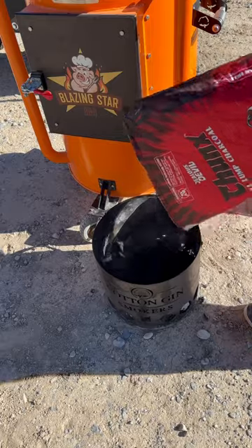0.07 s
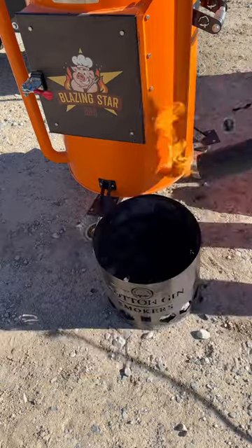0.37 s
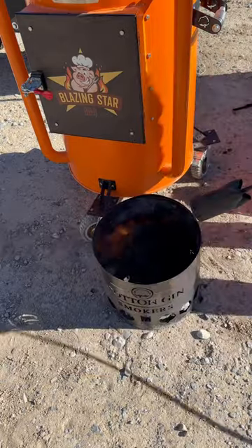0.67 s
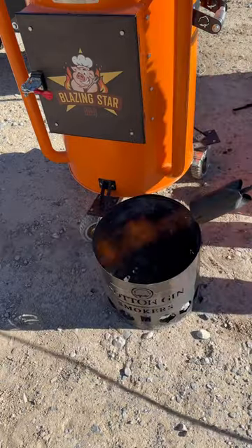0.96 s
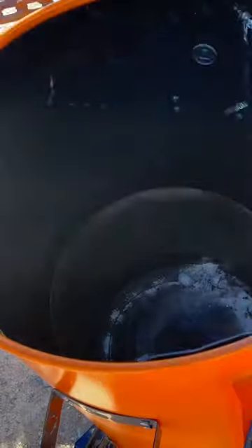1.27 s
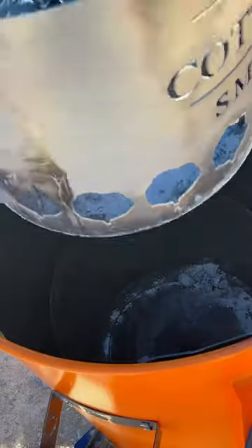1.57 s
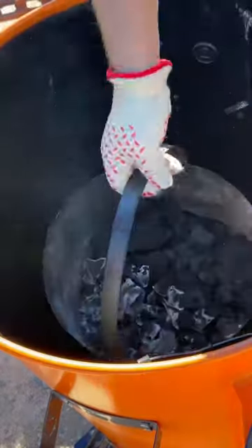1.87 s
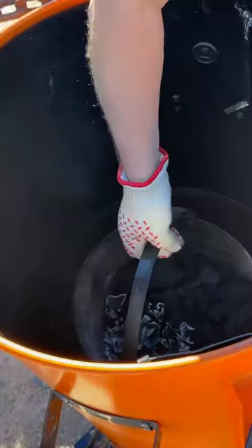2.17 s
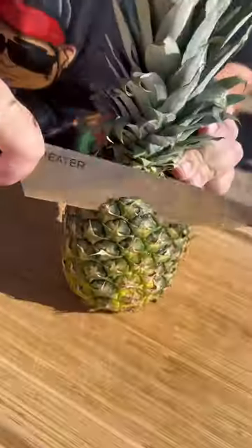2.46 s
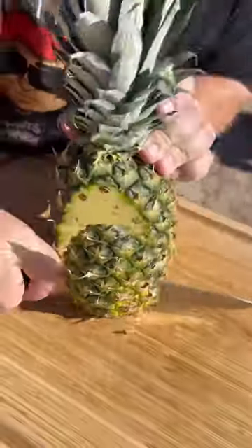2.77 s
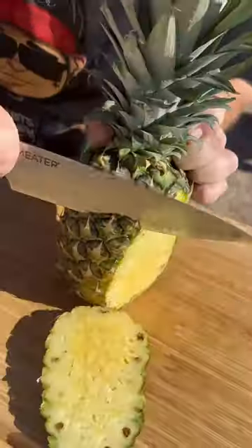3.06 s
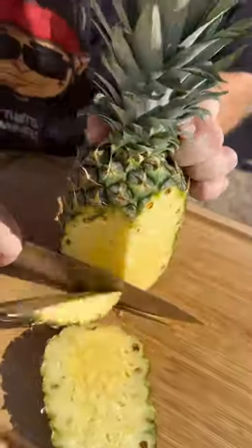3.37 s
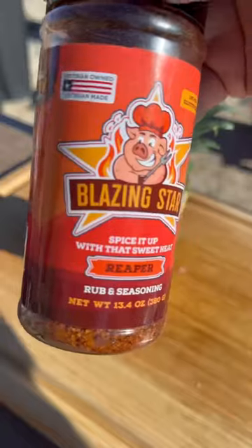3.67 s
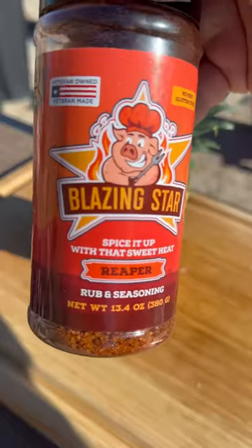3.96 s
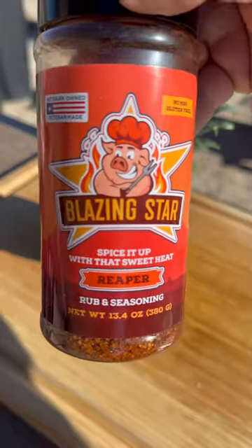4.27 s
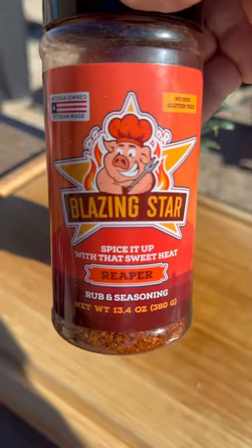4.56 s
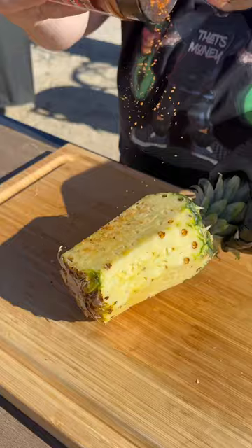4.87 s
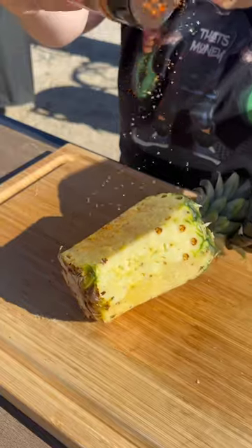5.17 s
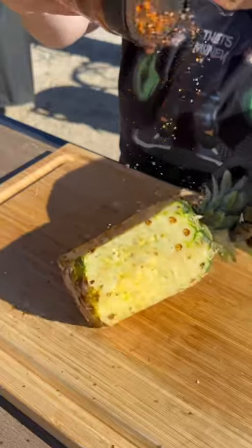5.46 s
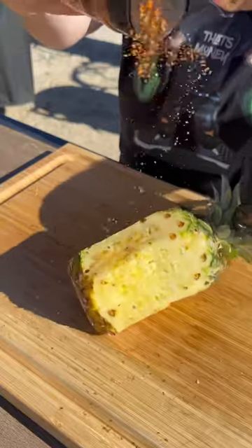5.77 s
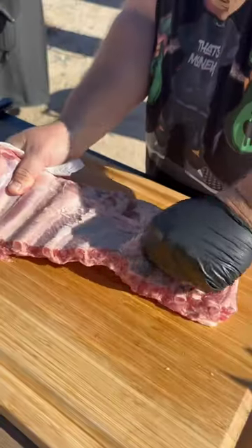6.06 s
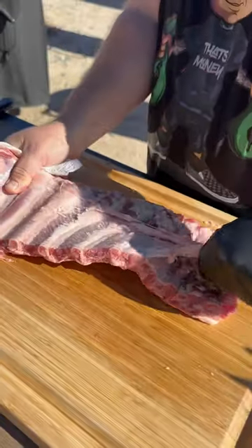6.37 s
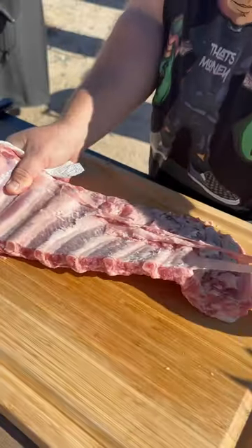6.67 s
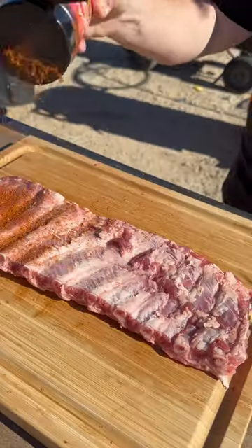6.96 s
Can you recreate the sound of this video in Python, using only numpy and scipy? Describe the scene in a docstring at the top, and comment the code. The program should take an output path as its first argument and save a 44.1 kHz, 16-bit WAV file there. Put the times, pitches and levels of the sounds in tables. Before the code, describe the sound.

Charcoal clatters briefly into a steel basket. A gas torch clicks, howls softly and roars, then the basket brushes quietly down into a drum. A knife crunches through pineapple, knocking on a wooden board. After a pause, a seasoning shaker hisses rhythmically, ribs are trimmed with wet scrapes, and fine grains pour faintly. Everything is close to a stereo microphone outdoors, over a low distant rumble.

```python
"""An outdoor barbecue, close to a stereo microphone pair, with a low rumble in the distance.
Lump charcoal clatters into a steel basket. A gas torch clicks, idles with a howl and roars into it,
then the basket brushes its way down into a drum. A knife crunches through a pineapple onto a wooden
board. After a pause a shaker hisses over a soft rustle; ribs are trimmed wetly while something hums
far off, and last a fine rub pours over them."""
import sys
import numpy as np
from scipy import signal
from scipy.fft import rfft, irfft
from scipy.io import wavfile
from scipy.ndimage import map_coordinates

SR = 44100
rng = np.random.default_rng(int(sys.argv[2]) if len(sys.argv) > 2 else 0)


def waveform_to_disk(signal):
    """Save audio, clipped to [-1, 1], as 16-bit WAV at the path in sys.argv[1]."""
    frames = np.transpose(np.atleast_2d(signal))
    scaled = np.clip(frames, -1, 1) * 32767
    samples = np.round(scaled).astype(np.int16)
    wavfile.write(sys.argv[1], SR, samples)


N = 318402
TIME = np.arange(N) / SR
SIDES = np.array([[1], [-1]])   # opposite polarity left and right


def from_db(db):
    """Decibels to gain."""
    return 10 ** (np.asarray(db) / 20)


def rms_one(x):
    """Scale to unit power."""
    return x / np.sqrt(np.mean(x ** 2) + 1e-20)


def drift(per_s):
    """A smooth random wander; rms 1."""
    knots = rng.standard_normal(8000)
    return rms_one(map_coordinates(knots, [TIME * per_s], order=3, mode="wrap"))


def gate(start_s, end_s, attack_s=.005, release_s=.005):
    """Attack, hold, release."""
    return np.clip((TIME - start_s) / attack_s, 0, 1) * np.clip((end_s - TIME) / release_s, 0, 1)


def swells(rows, lag_s=0):
    """A gain curve for each level column: every stroke climbs 20 dB in rise_s and sinks 20 dB in fall_s."""
    power = 0
    for peak_s, rise_s, fall_s, *levels_db in rows:
        age = TIME - peak_s - lag_s
        shape = from_db(-20 * np.minimum(np.maximum(-age / rise_s, age / fall_s), 10))
        power = power + np.outer(from_db(levels_db), shape) ** 2
    return np.sqrt(power)


def colour(x, spectrum, size=4096):
    """Causal (minimum-phase) filter with the given spectrum; white noise keeps its power."""
    hz, db = np.transpose(spectrum)
    grid = np.maximum(np.arange(size // 2 + 1) * SR / size, 1)
    cepstrum = irfft(np.log(from_db(np.interp(np.log(grid), np.log(hz), db))))
    cepstrum[1:size // 2] *= 2
    cepstrum[size // 2 + 1:] = 0
    response = irfft(np.exp(rfft(cepstrum)))
    return signal.oaconvolve(x, response / np.linalg.norm(response))[:N]


def noise(spectrum):
    """Steady noise with the given spectrum; rms about 1."""
    return colour(rng.standard_normal(N), spectrum)


def grains(per_s, spread_db, hiss_db):
    """Random tiny snaps of uneven size on a bed of hiss; rms 1."""
    sizes = from_db(spread_db * np.minimum(rng.exponential(1, N), 4)) * rng.choice([-1, 1], N)
    snaps = rms_one(sizes * (rng.random(N) < per_s / SR))
    return rms_one(snaps + from_db(hiss_db) * rng.standard_normal(N))


def burst(start_s, db, t60_s, size=6000):
    """A brittle contact: noise that starts at once and dies away."""
    out, start = np.zeros(N + size), round(start_s * SR)
    out[start:start + size] = from_db(db - 60 * np.arange(size) / SR / t60_s) * rng.standard_normal(size)
    return out[:N]


def strikes(rows):
    """One click for each row of start_s, level_db."""
    out = np.zeros(N)
    for start_s, db in rows:
        out[round(start_s * SR)] += from_db(db)
    return out


def ring(force, modes):
    """A unit click sets each mode ringing at its level."""
    out = np.zeros(N)
    for hz, db, t60_s in modes:
        decay, angle = from_db(-60 / (t60_s * SR)), 2 * np.pi * hz / SR
        feedback = [1, -2 * decay * np.cos(angle), decay * decay]
        out += from_db(db) * signal.lfilter([0, np.sin(angle)], feedback, force + 1e-18)
    return out


def air_resonance(hz, width_hz):
    """Turbulence ringing in a cavity whose pitch may move; rms 1."""
    low = signal.butter(2, width_hz / 2, fs=SR, output="sos")
    real, imaginary = signal.sosfilt(low, rng.standard_normal((2, N)))
    return rms_one(np.real((real + 1j * imaginary) * np.exp(2j * np.pi * np.cumsum(hz) / SR)))


# the far-off rumble: frequency_hz, level_db
RUMBLE_SPECTRUM = [(20, -32.5), (35, -14.5), (57, 0.5), (85, -0.5), (123, -7), (180, -15.5), (230, -16.5),
                   (320, -28.5), (500, -38.5), (900, -42.5), (1500, -55), (5000, -64.5), (15000, -76)]

def rumble():
    """A low distant rumble, alike on both sides of the microphone except for its thin top."""
    mid, side = noise(RUMBLE_SPECTRUM), noise(RUMBLE_SPECTRUM)
    side = signal.sosfilt(signal.butter(1, 600, "high", fs=SR, output="sos"), side)
    return from_db(-47.5) * (mid + from_db(-3) * side * SIDES)


# surges of charcoal out of the bag: peak_s, rise_s, fall_s, level_db
POUR_SURGES = [(.004, .02, 0.032, -22.5), (.026, .01, .1, -22), (.084, .012, 0.042, -19),
               (.119, .022, 0.083, -15.5)]
# big lumps landing: start_s, level_db, pitch_hz
LUMP_LANDINGS = [(.001, -22.5, 2860), (0.021, -9.5, 2150), (.029, -14.5, 2260), (.037, -19, 1960),
                 (.049, -20, 3570), (0.063, -14.5, 3190), (0.083, -12, 3740), (0.112, -13, 2430),
                 (.121, -14, 2400), (0.133, -23, 3370)]
# the steel basket: pitch_hz, level_db, t60_s
BASKET_MODES = [(640, -14, 0.041), (760, -2, 0.023), (1505, 2.5, 0.023), (2250, -4, .12), (2510, -3, 0.12),
                (2700, -3, .12), (3236, 3, 0.2), (3640, -1, 0.055), (4466, -6, 0.29), (6100, 0.5, .25),
                (5998, -22, .25), (7230, 2.5, 0.051)]
# the clatter, close up: frequency_hz, level_db
CHARCOAL_SPECTRUM = [(100, -15), (300, -9.5), (700, -2.5), (1300, -5), (1800, -4), (2600, 1), (4200, -3),
                     (6500, -9.5), (10000, -6.5), (15000, -18.5)]

def charcoal(end_s=.189):
    """Lumps and crumbs strike each other, clink briefly and set the steel basket ringing."""
    crumbs = swells(POUR_SURGES)[0] * grains(per_s=2400, spread_db=3, hiss_db=-4.5)
    lumps = sum(burst(start_s, db, t60_s=.017) for start_s, db, _ in LUMP_LANDINGS)
    force = crumbs + from_db(-10) * lumps
    clinks = sum(ring(strikes([(start_s, db)]), [(hz, -2, .04), (hz * 1.62, -7, .025)])
                 for start_s, db, hz in LUMP_LANDINGS)
    steel = from_db(-38) * ring(force, BASKET_MODES)
    pouring = np.clip((end_s - TIME) / .0034, 0, 1)
    return (from_db(3) * colour(force, CHARCOAL_SPECTRUM) + clinks + steel) * pouring


# the torch's trigger: start_s, level_db
TRIGGER_CLICKS = [(0.189, -32), (0.2, -26)]
# its brass valve: pitch_hz, level_db, t60_s
BRASS_MODES = [(6260, -21.5, 0.49), (6610, -2, 0.087), (6524, -1, 0.11), (7311, -34, .5)]

def valve():
    """The trigger scrapes and snaps over, and the small valve rings."""
    force = from_db(-15.5) * sum(burst(start_s, db, t60_s=.013) for start_s, db in TRIGGER_CLICKS)
    snaps = sum(burst(start_s, db + 2, t60_s=.017) for start_s, db in TRIGGER_CLICKS)
    return ring(force, BRASS_MODES) + snaps


ROAR_START_S, ROAR_ATTACK_S = .556, .018
# the idling flame: frequency_hz, level_db
PILOT_SPECTRUM = [(100, -3.5), (300, -7.5), (400, -13.5), (620, -6.5), (800, -14), (1100, -20), (1700, -22),
                  (2500, -35), (4000, -35), (5600, -40), (7300, -32.5), (9000, -39.5), (15000, -37)]

def pilot(start_s=.19, settle_s=.14, start_hz=1297, settled_hz=1005):
    """The idling flame howls in its nozzle, sinking in pitch, until the torch opens."""
    unsettled = np.exp(-np.maximum(TIME - start_s, 0) / settle_s)
    howl_hz = settled_hz + (start_hz - settled_hz) * unsettled
    howl = from_db(-2.5) * air_resonance(howl_hz, width_hz=240)
    overtone = from_db(-20.5) * air_resonance(howl_hz * 2.25, width_hz=280)
    idling = gate(start_s, ROAR_START_S + ROAR_ATTACK_S, attack_s=.054)
    return idling * from_db(-39.5) * (from_db(-1.5) * noise(PILOT_SPECTRUM) + howl + overtone)


# the open flame, close up: frequency_hz, level_db
ROAR_SPECTRUM = [(25, -17.5), (65, -7), (120, 1), (190, -4.5), (290, -14), (450, -6.5), (590, -6),
                 (740, -19.5), (900, -4.5), (1200, -19), (1500, -21.5), (2000, -38), (4000, -39.5)]
# the gas jet: frequency_hz, level_db
JET_SPECTRUM = [(900, -18.5), (1700, -13.5), (1900, -3), (2100, -6), (2400, -0.5), (2900, -10.5),
                (3300, -9.5), (4000, -16.5), (5000, -16.5), (6500, -14), (10000, -23), (15000, -15.5)]

def torch(end_s=1.2, swell_s=.91, swell_width_s=.16):
    """The flame roars into the hollow basket under its hissing jet; both swell once with the gas flow."""
    flow = np.exp(-((TIME - swell_s) / swell_width_s) ** 2)
    air_hz = 1049.5 - 49.46 * flow   # the basket's air rings lower at the top of the swell
    flame = from_db(.07) * noise(ROAR_SPECTRUM) + from_db(-5) * air_resonance(air_hz, width_hz=210)
    jet = from_db(-3) * noise(JET_SPECTRUM) + from_db(-5.5) * air_resonance(air_hz * 2.36, width_hz=140)
    gulps = from_db(1.26 * drift(per_s=140))   # the flame burns unevenly
    burning = gate(ROAR_START_S, end_s, attack_s=ROAR_ATTACK_S, release_s=.0026)
    jet_rasp = flow * from_db(-26.5) * air_resonance(hz=np.full(N, 2050), width_hz=650)
    return burning * gulps * (from_db(-15 + 2 * flow) * flame + from_db(-25.5 + 3 * flow) * jet + jet_rasp)


# brushes against the inside of the drum: peak_s, rise_s, fall_s, level_db
DRUM_BRUSHES = [(1.21, .01, .5, -58), (1.402, 0.078, 0.12, -54.5), (1.48, .1, .25, -62),
                (1.635, .02, 0.042, -59), (1.82, .06, .3, -58), (2.02, .3, .3, -56), (2.19, .2, .3, -58)]
# their shuffle: frequency_hz, level_db
BRUSH_SPECTRUM = [(400, 2.5), (800, -12.5), (1400, -6.5), (1900, -9.5), (2600, -9.5), (4000, -7.5),
                  (7000, -9.5), (10000, -13.5), (15000, -17.5)]

def lowering():
    """Glove and basket brush their way down the drum."""
    return swells(DRUM_BRUSHES)[0] * colour(grains(per_s=1500, spread_db=3.5, hiss_db=-2), BRUSH_SPECTRUM)


# short contacts of basket, blade, rind and bone: start_s, level_db, pitch_hz
CONTACTS = [(1.382, -44, 885), (1.424, -39, 1310), (1.586, -47, 1320), (2.349, -3.5, 2280),
            (2.353, 1.5, 865), (2.471, -24, 2700), (2.637, -19, 7250), (2.684, -7.5, 2700),
            (2.692, 0.5, 1540), (2.739, -15.5, 2700), (2.754, -26, 3500), (2.764, -24.5, 3000),
            (2.834, -19.5, 5080), (2.889, -40, 1800), (2.955, -20, 3930), (3.13, -4, 1800),
            (3.139, -2, 1630), (3.233, -19, 3220), (3.288, -21, 4640), (3.362, -23.5, 6000),
            (5.557, -27, 8000), (5.957, -30, 4440), (6.121, -18, 7000), (6.62, -37, 3000),
            (6.766, -23, 5130), (6.768, -22.5, 1100), (6.843, -24.5, 2250), (6.849, -17, 720)]

def ticks(t60_s=.013, band_ratio=2.1, size=6000):
    """Each contact is a short crack, broadly peaked at its own pitch, with a thin bright edge."""
    out, age = np.zeros(N + size), np.arange(size) / SR
    fade = from_db(-60 * age / t60_s) * (1 - np.exp(-age / .001))
    for start_s, db, hz in CONTACTS:
        band = signal.butter(2, [hz / band_ratio, hz * band_ratio], "band", fs=SR, output="sos")
        snap = fade * rng.standard_normal(size)
        crack = signal.sosfilt(band, snap) + from_db(-15.5) * snap
        start = round(start_s * SR)
        out[start:start + size] += from_db(db) * crack * np.linalg.norm(fade) / np.linalg.norm(crack)
    return out[:N]


# knife strokes through the pineapple: peak_s, rise_s, fall_s, flesh_db, fibre_db
KNIFE_STROKES = [(2.351, 0.026, .03, -12, -17), (2.376, 0.024, 0.063, -10, -21.5),
                 (2.462, 0.024, 0.077, -41.5, -31.5), (2.548, 0.079, .09, -32.5, -27.5),
                 (2.645, 0.023, 0.055, -26.5, -22), (2.68, 0.066, 0.069, -22.5, -25),
                 (2.936, 0.0047, 0.04, -46, -40.5), (3.084, 0.012, 0.16, -32, -27.5),
                 (3.126, 0.033, 0.049, -20.5, -21), (3.24, 0.054, 0.031, -41.5, -32),
                 (3.43, 0.44, 0.23, -75, -54), (3.505, 0.028, .06, -51.5, -48)]
# crushed flesh: frequency_hz, level_db
FLESH_SPECTRUM = [(40, -12), (90, 2.5), (250, -1), (450, -1.5), (800, 2.5), (1500, -4.5), (2800, -9),
                  (4200, -22.5), (10000, -37.5)]
# tearing fibres: frequency_hz, level_db
FIBRE_SPECTRUM = [(100, -10.5), (400, -4.5), (900, -4.5), (2400, 2.5), (3600, 0.5), (5000, -1.5),
                  (8000, 1.5), (11000, -5), (15000, 2)]

def pineapple(flesh_drag_db=-72, fibre_drag_db=-62):
    """The rind's fibres snap brightly in uneven bunches; just after, juicy cells burst dully."""
    # between strokes the blade drags lightly in the fruit
    crushing = swells(KNIFE_STROKES, lag_s=.011)[0] + from_db(flesh_drag_db)
    tearing = swells(KNIFE_STROKES)[1] + from_db(fibre_drag_db)
    flesh = crushing * colour(grains(per_s=1800, spread_db=4.5, hiss_db=.5), FLESH_SPECTRUM)
    fibres = tearing * colour(grains(per_s=3500, spread_db=7, hiss_db=1), FIBRE_SPECTRUM)
    bunches = from_db(2.2 * drift(per_s=180))
    return (flesh + fibres * bunches) * gate(start_s=2.317, end_s=3.532)


# the blade pressed down onto the board: start_s, thud_db, knock_db
BLADE_LANDINGS = [(2.355, -14, -9), (2.367, -9.5, -20), (2.38, -22, -3), (2.476, -27.5, -39),
                  (2.574, -27, -42.5), (2.644, -28, -28), (2.693, -52, -17.5), (3.097, -23.5, -25),
                  (3.144, -30.5, -17.5), (3.382, -37.5, -63), (6.768, -57, -40.5), (6.853, -39, -43.5)]
# the table underneath: pitch_hz, level_db, t60_s
TABLE_MODES = [(80.6, 3, 0.15), (108, -14.5, 0.04)]
# the wooden board: pitch_hz, level_db, t60_s
BOARD_MODES = [(235, -21.5, 0.26), (324.6, -19, 0.28), (427, -9, 0.16), (647, -16, 0.1), (693, -16.5, 0.13),
               (863, -11.5, 0.053), (980, -21.5, 0.053), (1140, -27.5, 0.18), (1470, -15.5, 0.27)]

def board():
    """The blade lands through soft food: the table thuds and the board knocks."""
    thuds = strikes([(start_s, db) for start_s, db, _ in BLADE_LANDINGS])
    knocks = strikes([(start_s, db) for start_s, _, db in BLADE_LANDINGS])
    soft = signal.butter(1, 1500, fs=SR, output="sos")
    return signal.sosfilt(soft, ring(thuds, TABLE_MODES) + ring(knocks, BOARD_MODES))


SHAKE_START_S = 4.646
# dry flakes in the shaker: frequency_hz, level_db
FLAKE_SPECTRUM = [(400, -12), (600, -25), (850, -14), (1100, -14), (1900, -7), (2500, -2.5), (3600, -2),
                  (4900, -6), (6300, 2.5), (7300, -0.5), (9000, -1.5), (11000, -2.5), (15000, -7)]

def shaker(first_turn_s=4.692, shakes_per_s=7.34, growth_db_per_s=2.8):
    """Dry flakes slide and hiss at each even swing over the pineapple, a little harder as it goes."""
    age = TIME - first_turn_s
    swing_db = -7 * np.abs(np.sin(np.pi * shakes_per_s * age))   # loudest as the shaker turns
    level = from_db(-46 + swing_db + growth_db_per_s * age)
    clumps = from_db(.9 * drift(per_s=60))
    flakes = colour(grains(per_s=3500, spread_db=4.5, hiss_db=1), FLAKE_SPECTRUM)
    return gate(SHAKE_START_S, end_s=5.89, release_s=.039) * level * clumps * flakes


# the rustle around the microphone: frequency_hz, level_db
RUSTLE_SPECTRUM = [(250, -11.5), (420, 1.5), (620, -9), (880, -3.5), (1150, -12), (1400, -8.5), (2000, -14),
                   (6000, -19)]

def rustle(fade_db_per_s=4):
    """A soft low rustle from all around comes with the first shakes and slowly fades."""
    mid, side = noise(RUSTLE_SPECTRUM), noise(RUSTLE_SPECTRUM)
    fading = from_db(-60.5 - fade_db_per_s * np.maximum(TIME - SHAKE_START_S, 0))
    return gate(SHAKE_START_S, np.inf) * fading * (mid + from_db(.5) * side * SIDES)


def hum(pitch_hz=234):
    """A faint tone, far off and dead centre, while the ribs are trimmed."""
    humming = gate(start_s=5.88, end_s=6.8, attack_s=.038, release_s=.033)
    return humming * from_db(-59) * np.sin(2 * np.pi * pitch_hz * TIME)


# knife strokes along the ribs: peak_s, rise_s, fall_s, parting_db, scrape_db
RIB_STROKES = [(5.89, 0.016, 0.071, -58.5, -57.5), (6.085, .11, .12, -43.5, -62),
               (6.228, .1, .17, -41, -54), (6.42, 0.26, .2, -62, -51.5), (6.505, 0.061, 0.1, -38.5, -39),
               (6.7, 0.054, 0.1, -49.5, -70), (6.79, 0.065, 0.13, -40.5, -56)]
# wet meat parting: frequency_hz, level_db
MEAT_SPECTRUM = [(400, -6.5), (1000, -11), (2200, -3.5), (3700, -4), (5700, 0), (9000, 1), (11000, 0.5),
                 (15000, -1.5)]
# blade on bone: frequency_hz, level_db
BONE_SPECTRUM = [(250, -9), (500, -3.5), (1050, -8), (1600, -4), (2600, -3.5), (3600, 1), (4600, -8),
                 (10000, -21)]

def ribs():
    """Wet meat parts in tiny smacks while the blade scrapes along the bone."""
    parting, scraping = swells(RIB_STROKES)
    bunches = from_db(2 * drift(per_s=220))
    smacks = colour(grains(per_s=1500, spread_db=5, hiss_db=3.5), MEAT_SPECTRUM)
    bone = colour(grains(per_s=450, spread_db=6, hiss_db=2), BONE_SPECTRUM)
    return parting * bunches * smacks + scraping * bone


# fine seasoning falling: frequency_hz, level_db
RUB_SPECTRUM = [(400, -1), (900, -5), (1500, -9), (2200, 2.5), (3800, 3), (4900, -3), (6500, 5.5),
                (9000, -5), (15000, -18)]

def rub():
    """Fine grains pour steadily over the ribs."""
    patter = colour(grains(per_s=5000, spread_db=9.5, hiss_db=-.5), RUB_SPECTRUM)
    return gate(start_s=6.865, end_s=np.inf) * from_db(-58) * patter


def place(x, left_over_right_db, left_lag_ms, shadow_hz=400):
    """Above the bass one microphone port hears a source louder; the left port hears it a moment late."""
    top = signal.sosfilt(signal.butter(1, shadow_hz, "high", fs=SR, output="sos"), x)
    left = x + (from_db(left_over_right_db / 2) - 1) * top
    right = x + (from_db(-left_over_right_db / 2) - 1) * top
    late_left = map_coordinates(left, [np.arange(N) - left_lag_ms * SR / 1000], order=3)
    return np.array([late_left, right])


# reflections off nearby ground and gear: frequency_hz, level_db
REFLECTION_SPECTRUM = [(100, -35), (500, -4.5), (1200, -9.5), (2500, 0.5), (4600, 5), (6500, -1.5),
                       (9000, 3), (11500, -23.5), (15000, -6)]

def reflections(x, t60_s=.03, size=6000):
    """Brief reflections reach the microphone from the sides, strongest in the lower treble."""
    tail = rng.standard_normal(size) * from_db(-60 * np.arange(size) / SR / t60_s)
    return signal.oaconvolve(colour(x, REFLECTION_SPECTRUM), tail / np.linalg.norm(tail))[:N] * SIDES


def scene():
    """All the work is close to the microphone: torch a little right, chopping board a little left."""
    middle = charcoal() + lowering() + ticks() + shaker() + ribs() + rub()
    flame = valve() + pilot() + torch()
    cutting = pineapple() + board()
    direct = (place(middle, left_over_right_db=.2, left_lag_ms=.04)
              + place(flame, left_over_right_db=-1.3, left_lag_ms=.029)
              + place(cutting, left_over_right_db=1, left_lag_ms=.029))
    echoes = from_db(-14) * reflections(middle + flame + cutting)
    return direct + echoes + rumble() + rustle() + hum()


def record(dry):
    """The microphone pair loses two treble bands at the centre, deep bass and the very top; peaks round."""
    dip_hz, dip_width_hz, dip_depth = 4550, 1700, .3   # the two ports partly cancel here
    null_hz, cutoff_hz = (10600, 13800), 16000   # in the null they cancel wholly
    centre = dry.mean(axis=0)
    dip_band = signal.lfilter(*signal.iirpeak(dip_hz, dip_hz / dip_width_hz, fs=SR), centre)
    null = signal.butter(2, null_hz, "bandstop", fs=SR, output="sos")
    notched = signal.sosfilt(null, centre - dip_depth * dip_band)
    heard = signal.sosfilt(signal.butter(2, 38, "high", fs=SR, output="sos"), dry - centre + notched)
    rounded = heard / (1 + heard ** 6) ** (1 / 6)
    return signal.sosfilt(signal.ellip(10, .1, 80, cutoff_hz, fs=SR, output="sos"), rounded)


dry = scene()
out = record(dry)
waveform_to_disk(out)
```